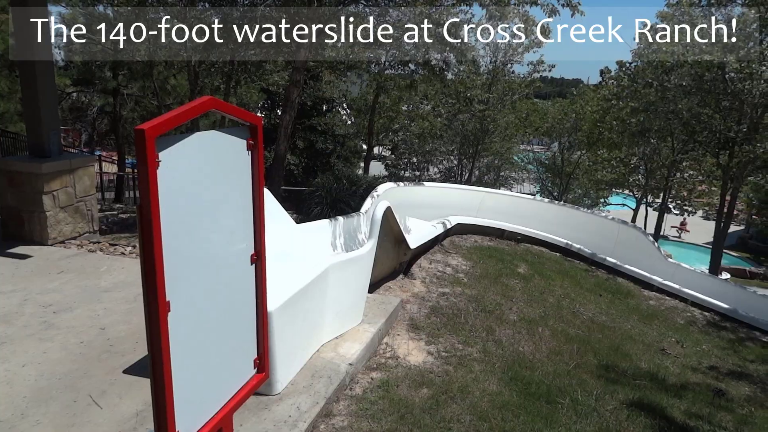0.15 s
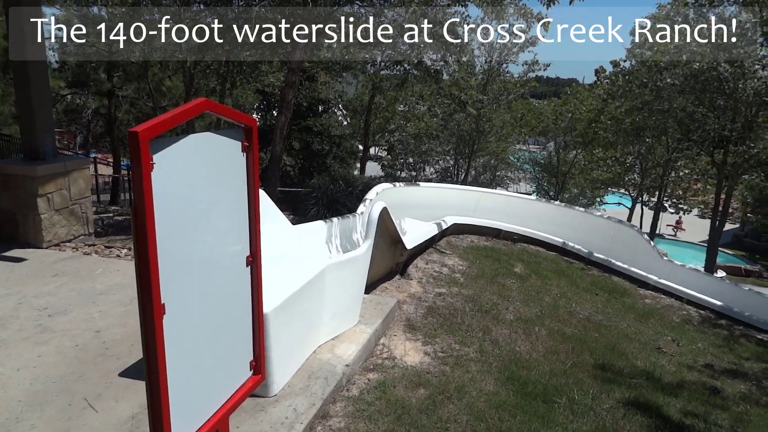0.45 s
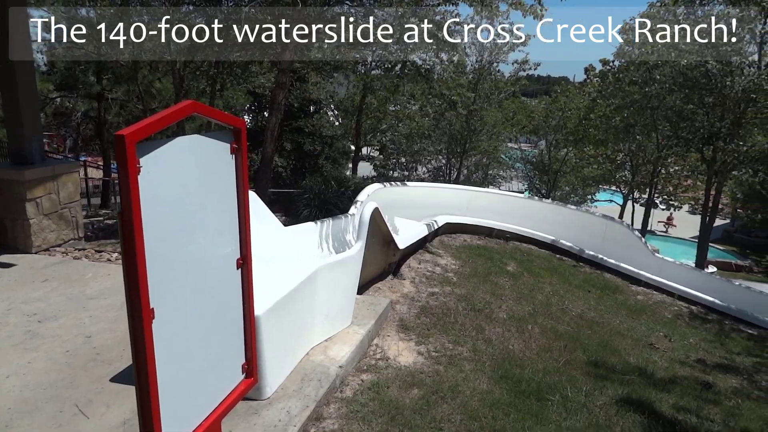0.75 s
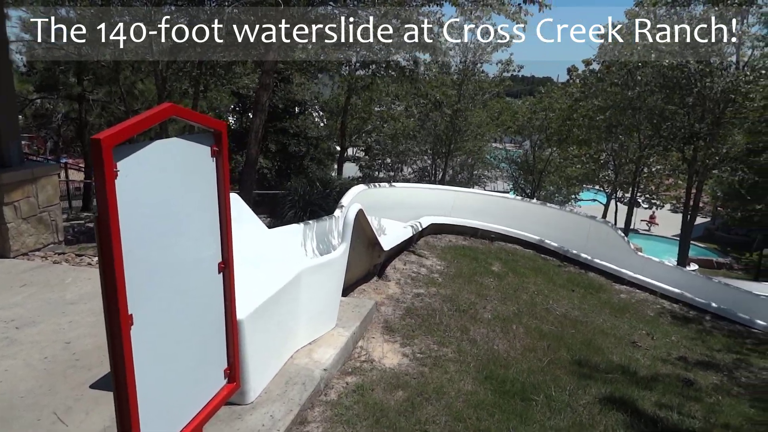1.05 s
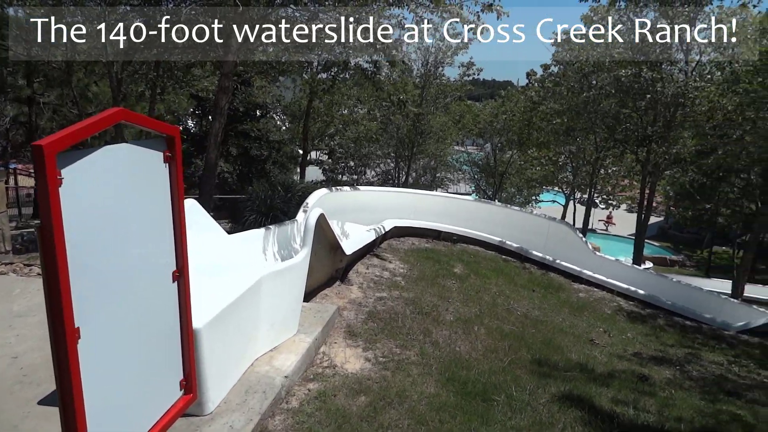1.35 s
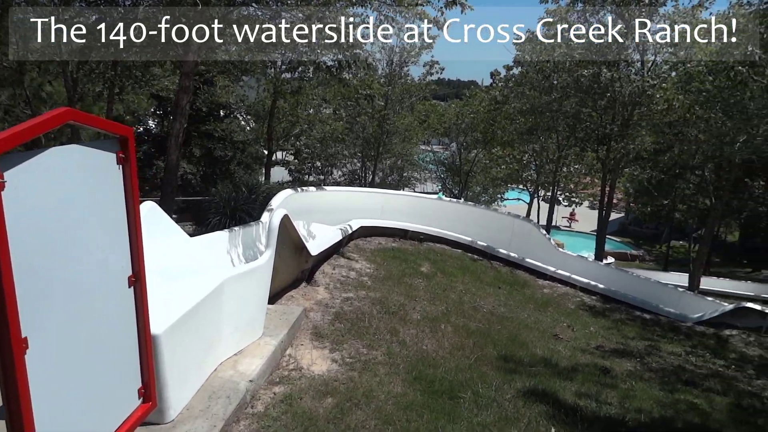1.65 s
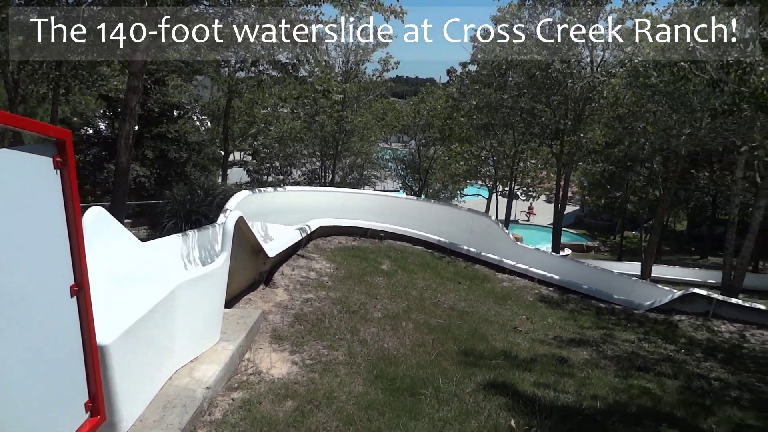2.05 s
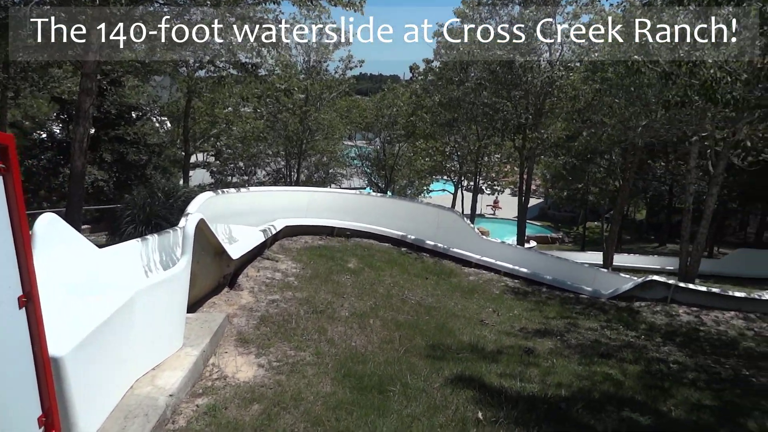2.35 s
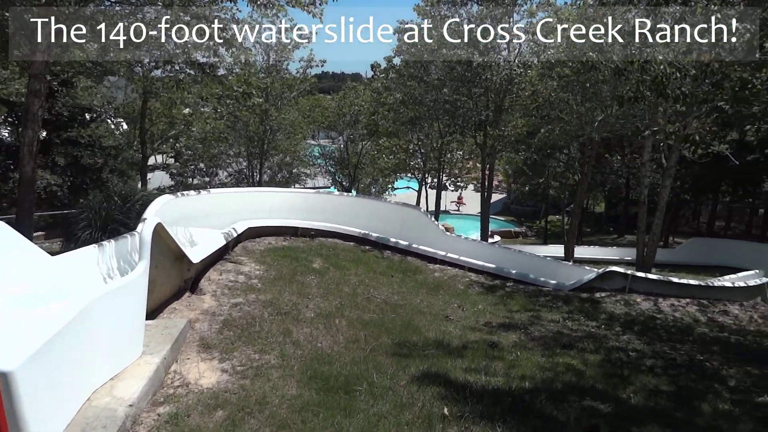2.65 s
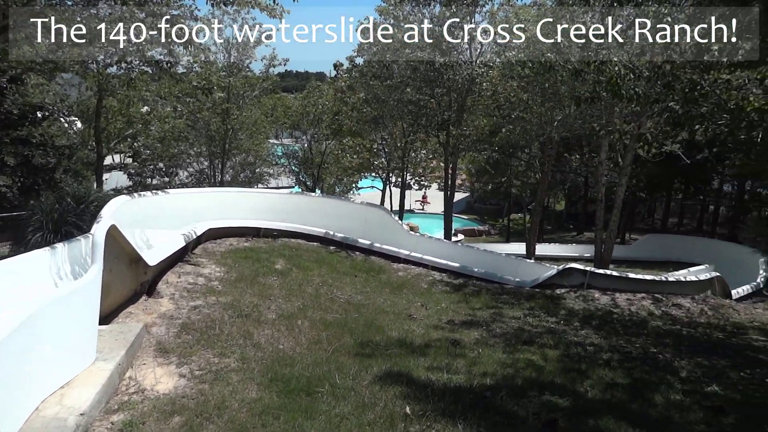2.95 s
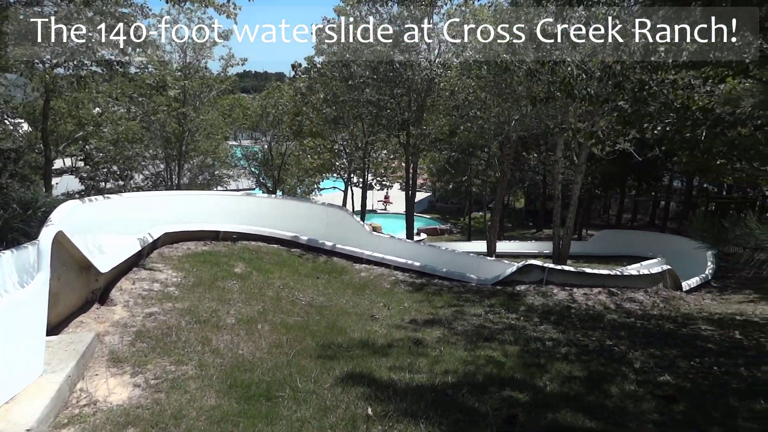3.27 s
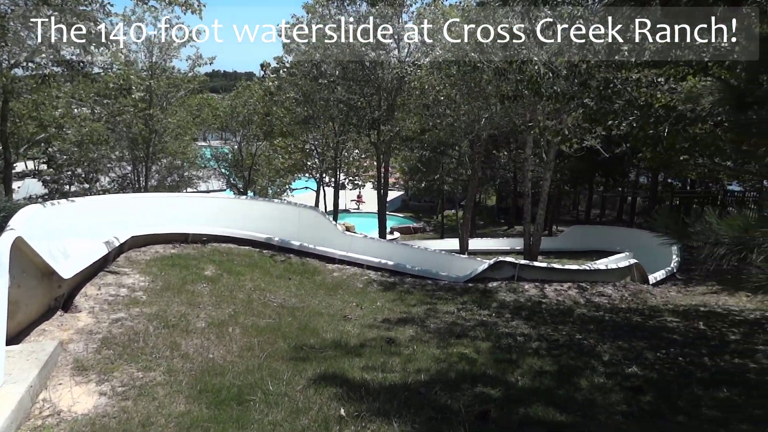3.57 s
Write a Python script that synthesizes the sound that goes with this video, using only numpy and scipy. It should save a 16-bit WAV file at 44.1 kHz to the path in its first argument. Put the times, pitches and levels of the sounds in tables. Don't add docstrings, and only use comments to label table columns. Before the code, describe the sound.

Steady rush of water along a fibreglass slide outdoors, with hollow glugs and fine splashes

```python
import sys
import numpy as np
from scipy import signal
from scipy.fft import rfft, irfft, next_fast_len
from scipy.io import wavfile
from scipy.ndimage import uniform_filter1d, map_coordinates

SR = 44100
rng = np.random.default_rng(int(sys.argv[2]) if len(sys.argv) > 2 else 0)


def dump_mix(stems):
    frames = np.atleast_2d(stems).T
    limited = np.clip(frames, -1, 1)
    pcm = np.round(limited * 32767).astype(np.int16)
    wavfile.write(sys.argv[1], SR, pcm)


def level_to_linear(level):
    exponent = np.asarray(level, float) / 20
    return 10 ** exponent


N = 163611


def unit(x):
    return x / np.sqrt(np.mean(x ** 2) + 1e-20)


def along(points, hz):
    f, v = np.transpose(points)
    return np.interp(np.log(hz + 1), np.log(f + 1), v)


def curves(rows):
    s, *cols = np.transpose(rows)
    return [np.interp(np.arange(N) / SR, s, c) for c in cols]


def wobble(rate_hz):
    return map_coordinates(rng.standard_normal(N // 100), [np.arange(N) * rate_hz / SR])


def filtered(x, response):
    m = next_fast_len(N + SR // 2)
    return irfft(rfft(x, m) * response(np.fft.rfftfreq(m, 1 / SR)), m)[..., :N]


def peaks(table):
    def response(f):
        total = 0
        for k, (c, w, db) in enumerate(table):
            total = total + (-1) ** k * level_to_linear(db) * 1j * f * w / (c * c - f * f + 1j * f * w)
        return total
    return response


def spread(pair, alike):
    def rotation(hz):
        turn = np.arccos(np.clip(along(alike, hz), -1, 1)) / 2
        return np.array([np.cos(turn), np.sin(turn)])
    mid, side = filtered(pair, rotation)
    return unit(np.array([mid + side, mid - side]))


def patchy(patchy_db):
    z = signal.stft(rng.standard_normal((2, N)), nperseg=512)[2]
    field = uniform_filter1d(rng.standard_normal(z.shape[1:]), size=4, axis=0)
    field = uniform_filter1d(field, size=6, axis=1)
    return signal.istft(z * level_to_linear(patchy_db * unit(field)), nperseg=512)[1][:, :N]


def grains(pitch_hz, octaves, cycles, scatter_db, rise, count, size):
    when = rng.random((2, count, 1))
    detune = rng.standard_normal((2, count, 1))
    strength = np.minimum(rng.exponential(size=(2, count, 1)), 3)
    turns = np.clip(pitch_hz * 2 ** (octaves * detune), 100, 11000) * np.arange(size) / SR
    u = turns / cycles
    envelope = level_to_linear(scatter_db * strength) * np.exp(-u) * (1 - np.exp(-4 * u))
    shape = envelope * np.sin(2 * np.pi * turns * (1 + rise * u / 2))
    at = (when * N).astype(int) + np.arange(size)
    return unit(np.array([np.bincount(a.ravel(), s.ravel(), N + size)[:N] for a, s in zip(at, shape)]))


# t/s, level/dB
INSECT_LEVEL = [
    (0, -49),
    (1.1, -46),
    (1.45, -45),
    (1.6, -62),
    (3.7, -69),
]


def insect():
    level_db, = curves(INSECT_LEVEL)
    buzz = peaks([(9900, 330, 0)])
    noise = filtered(rng.standard_normal((2, N)), lambda hz: buzz(hz) ** 2)
    return level_to_linear(level_db + 2.0 * wobble(7.3)) * spread(noise, [(9000, 1.0)])


# t/s, level/dB
BREEZE_LEVEL = [(.06, -50), (.3, -50), (.4, -40), (.8, -43), (.87, -64), (1.2, -52), (1.32, -55),
                (1.5, -58), (1.75, -60), (2.15, -62), (2.3, -48), (2.85, -62), (3.5, -70), (3.68, -52)]
# f/Hz, density/dB
BREEZE_SPECTRUM = [(25, -61), (70, -7), (150, -5.5), (250, 1), (450, -9), (900, -19.5)]
# t/s, level/dB, length/s, centre f/Hz
PUFF_EVENTS = [(0.115, -45, .04, 70), (0.388, -42.5, .03, 90), (0.452, -31.5, 0.019, 169),
               (0.567, -40, 0.034, 110), (0.645, -28, 0.031, 159), (0.67, -24, 0.021, 270),
               (0.704, -41, .03, 100), (0.732, -41, 0.035, 80), (0.816, -41, .025, 130),
               (1.378, -31, .02, 210), (1.386, -35, .02, 95), (1.405, -32.5, 0.018, 119),
               (1.428, -31.5, 0.027, 220), (1.615, -56, 0.018, 190), (2.327, -53, 0.074, 90),
               (2.61, -42.5, 0.024, 180)]
# f/Hz, likeness/1
PORT_LIKENESS = [(40, 0.94), (120, .65), (300, .1)]


def breeze():
    octaves, floor_hz = .9, 75
    level_db, = curves(BREEZE_LEVEL)
    t, white = np.arange(N) / SR, rng.standard_normal((2, 2, N))
    steady = filtered(white[0], lambda hz: level_to_linear(along(BREEZE_SPECTRUM, hz)))
    out = level_to_linear(level_db + 1.8 * wobble(22.15)) * spread(steady, PORT_LIKENESS)
    gusty = spread(white[1], PORT_LIKENESS)
    for s, db, length_s, centre_hz in PUFF_EVENTS:
        def band(hz):
            bell = np.exp(-(np.log2((hz + 1) / centre_hz) / octaves) ** 2)
            return bell * hz ** 2 / (hz ** 2 + floor_hz ** 2)
        shape = np.exp(-(2 * (t - s) / length_s) ** 2)
        puff = shape * filtered(gusty, band)
        out += level_to_linear(db) * puff * np.linalg.norm(shape) / np.linalg.norm(puff.mean(axis=0))
    return out


# f/Hz, density/dB
WATER_SPECTRUM = [(25, -59), (60, -30), (130, -19.5), (270, -13.5),
                  (370, -5.5), (500, -1.5), (930, -1), (1040, -5), (2000, -9), (3150, -10), (5000, -15.5),
                  (11000, -20)]


def sheet():
    return unit(filtered(patchy(patchy_db=1.53), lambda hz: level_to_linear(along(WATER_SPECTRUM, hz))))


def fizz():
    return grains(pitch_hz=2683, octaves=0.612, cycles=5.4, scatter_db=3, rise=0.13, count=5000, size=300)


def drops():
    return grains(pitch_hz=2798, octaves=.9, cycles=8.4, scatter_db=7.5, rise=0.018, count=700, size=900)


def spit():
    return grains(pitch_hz=6000, octaves=0.75, cycles=0.83, scatter_db=6.5, rise=0.017, count=3000, size=64)


# f/Hz, width/Hz, level/dB
TROUGH_MODES = [(484, 119, 2), (881, 150, 1.5)]


def bubbles():
    top_hz = 1040
    ringing = grains(pitch_hz=639, octaves=0.416, cycles=3.2, scatter_db=4.5, rise=0.025, count=1000, size=1200)
    return unit(filtered(ringing, lambda hz: peaks(TROUGH_MODES)(hz) / (1 + (hz / top_hz) ** 12)))


# t/s, peak level/dB, f/Hz, length/s
POCKETS = [(0.194, -14.5, 428, 0.017), (0.269, -17, 810, 0.012), (0.679, -17, 497, 0.017),
           (0.834, -16, 510, 0.012), (0.915, -11.5, 490, 0.013), (0.931, -20.5, 530, 0.015),
           (0.993, -14.5, 510, 0.014), (1.016, -20.5, 480, 0.018), (1.109, -18, 516, 0.014),
           (1.162, -11.5, 533, 0.012), (1.303, -16, 526, 0.017), (1.326, -14, 620, 0.011),
           (1.344, -14.5, 517, 0.01), (1.426, -15.5, 787, 0.026), (1.605, -11.5, 810, 0.012),
           (1.731, -10, 484, 0.011), (1.77, -15.5, 840, 0.02), (2.092, -17, 830, 0.011),
           (2.218, -21, 563, 0.012), (2.246, -14, 415, 0.021), (2.324, -12, 504, 0.01),
           (2.385, -14.5, 540, 0.014), (2.474, -11, 483, 0.012), (2.489, -15.5, 617, 0.013),
           (2.66, -11.5, 503, 0.01), (2.671, -14, 606, 0.018), (2.711, -16.5, 855, 0.027),
           (3.085, -28, 907, 0.016), (3.188, -11.5, 700, 0.009), (3.475, -14.5, 883, 0.012)]


def glugs():
    rise, width_hz, trough_db, level_db = .3, 120, -13, -7
    out, t = np.zeros(N + SR), np.arange(SR // 6) / SR
    f = np.fft.rfftfreq(len(t), 1 / SR)
    trough = level_to_linear(trough_db) * peaks(TROUGH_MODES)(f) ** 2
    for s, db, hz, length_s in POCKETS:
        rough = rfft(rng.standard_normal(len(t)))
        u = t / length_s
        shape = (1 - np.exp(-(u / rise) ** 2)) * np.exp(-u ** 2)
        pocket = peaks([(hz, width_hz, 0)])(f) ** 2 + trough
        burst = shape * irfft(rough * pocket, len(t))
        burst *= np.linalg.norm(shape / shape.max()) / np.linalg.norm(burst)
        out[round(s * SR):][:len(t)] += level_to_linear(db + level_db) * burst
    return out[:N]


# t/s, level/dB, left over right/dB
FLOW_LEVEL = [(.06, -27.5, 0.2), (.13, -26.5, .4), (.4, -27, 0.2), (.82, -27.5, .5), (1.1, -26.5, .5),
              (1.3, -27.5, .6), (1.6, -26.5, .7), (1.85, -27.5, 0.6), (2.2, -27.5, 1.5), (2.6, -27.5, 1.3),
              (3, -27, 1.2), (3.3, -27, 1.4), (3.6, -27, 1.5), (3.7, -28, 1.5)]
# f/Hz, likeness/1
WATER_LIKENESS = [(60, 1), (170, 0.94), (490, 0.95), (1410, 0.91), (4050, 0.88), (11600, 0.82)]


def water():
    flow_db, pan_db = curves(FLOW_LEVEL)
    swell_db = flow_db + 0.1 * wobble(3.9) + 0.13 * wobble(14)
    layers = [(3.5, sheet()),
              (-10.5 + 4.5 * wobble(10), bubbles()),
              (-6 + 0.38 * wobble(7.2), fizz()),
              (-10, drops()),
              (-14 + 0.52 * wobble(30), spit())]
    flow = sum(level_to_linear(db) * spread(x, WATER_LIKENESS) for db, x in layers)
    return (level_to_linear(swell_db) * flow + glugs()) * level_to_linear(np.array([pan_db, -pan_db]) / 2)


def scene():
    return insect() + breeze() + water()


# t/s, limit f/Hz
LIMIT_OPENINGS = [(.21, 11200), (.605, 11350), (.745, 11350), (1.36, 11170), (1.67, 11560), (1.89, 11200),
                  (2.42, 11200), (2.9, 11560), (3.18, 11200), (3.27, 11200), (3.48, 11560), (3.64, 11220)]


def band_limit(dry):
    top_hz, open_s, open_db = 11060, .018, -9
    t, mono = np.arange(N) / SR, dry.mean(axis=0)
    kept = filtered(dry, lambda hz: hz < top_hz)
    for s, limit_hz in LIMIT_OPENINGS:
        extra = filtered(mono, lambda hz: (hz >= top_hz) & (hz < limit_hz))
        kept = kept + level_to_linear(open_db) * np.exp(-((t - s) / open_s) ** 2) * extra
    return kept


def holes(pair):
    hole_db, from_hz = -6, 4200
    hz, _, z = signal.stft(pair[0] - pair[1], SR, nperseg=2048)
    power = uniform_filter1d(abs(z) ** 2, size=6, axis=0)
    weak = (power < level_to_linear(2 * hole_db) * power.mean(axis=1, keepdims=True)) & (hz[:, None] > from_hz)
    near = uniform_filter1d(uniform_filter1d(weak * 1., size=5, axis=0), size=2, axis=1)
    lost = signal.istft(z * (near > 1e-6), SR, nperseg=2048)[1][:N] / 2
    return pair - np.array([lost, -lost])


def roll_off(x):
    return signal.sosfilt(signal.butter(12, 12210, fs=SR, output="sos"), x)


def record(dry):
    start_s, fade_s, before_db = .0591, .0002, -70
    gate = np.clip((np.arange(N) / SR - start_s) / fade_s, level_to_linear(before_db), 1)
    return roll_off(holes(band_limit(dry)) * gate)


dry = scene()
out = record(dry)
dump_mix(out)
```